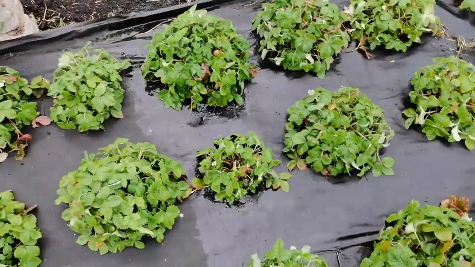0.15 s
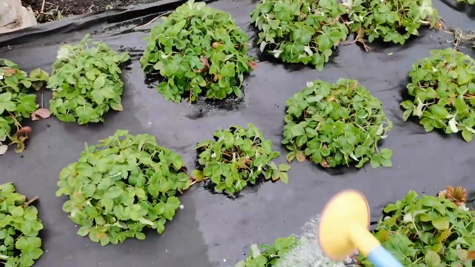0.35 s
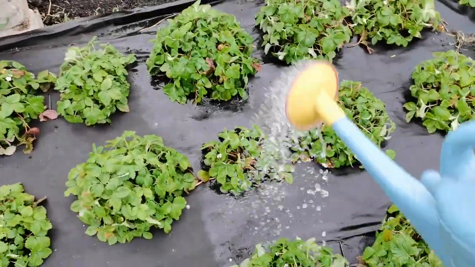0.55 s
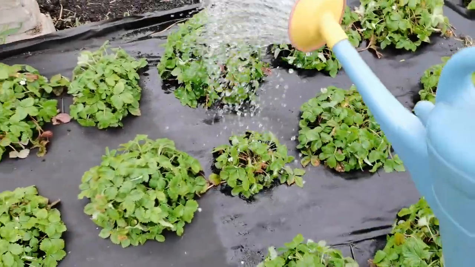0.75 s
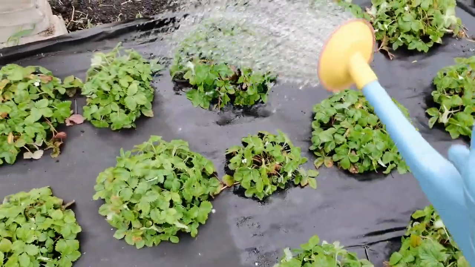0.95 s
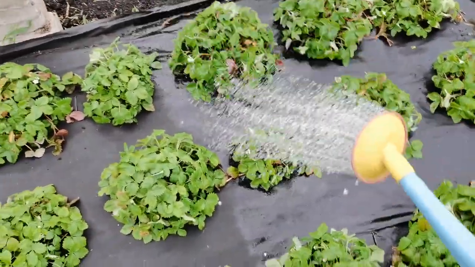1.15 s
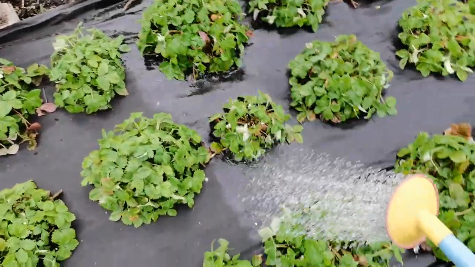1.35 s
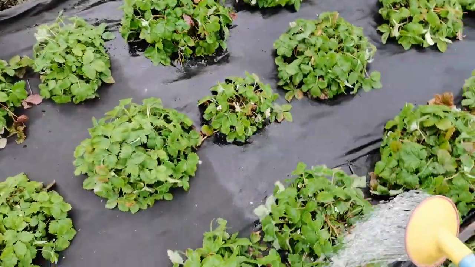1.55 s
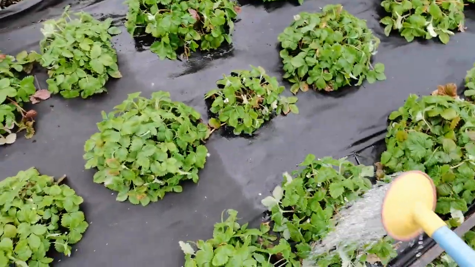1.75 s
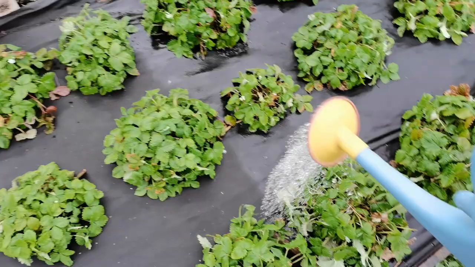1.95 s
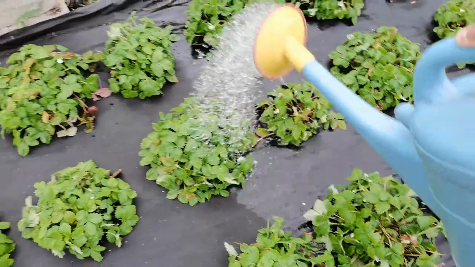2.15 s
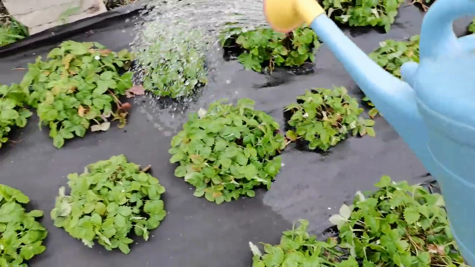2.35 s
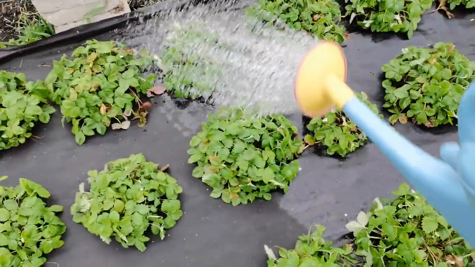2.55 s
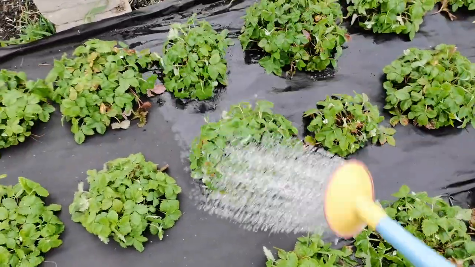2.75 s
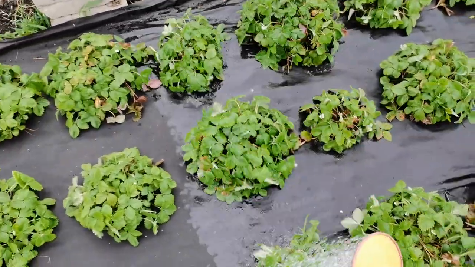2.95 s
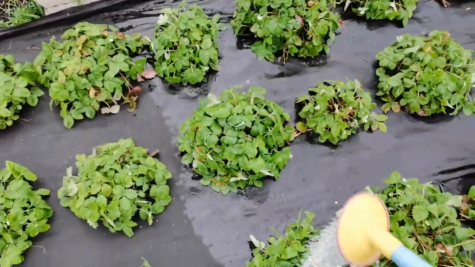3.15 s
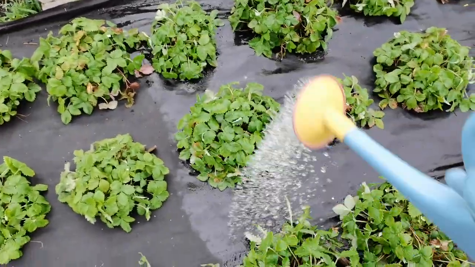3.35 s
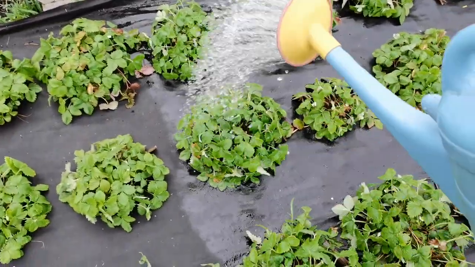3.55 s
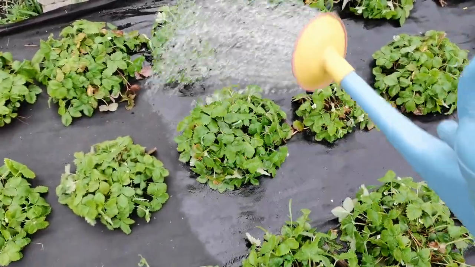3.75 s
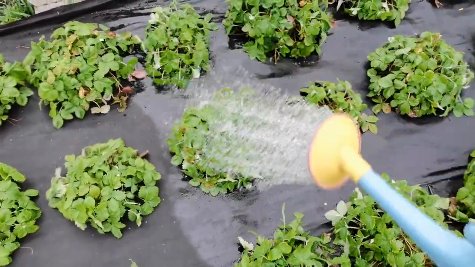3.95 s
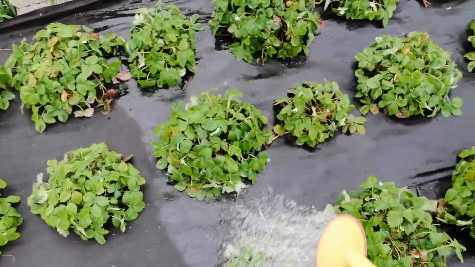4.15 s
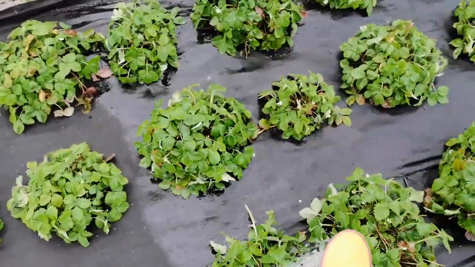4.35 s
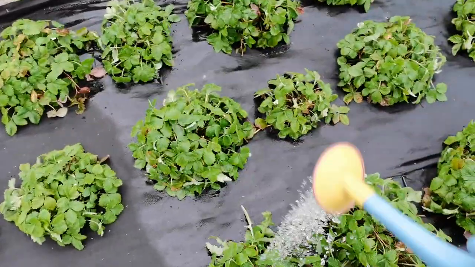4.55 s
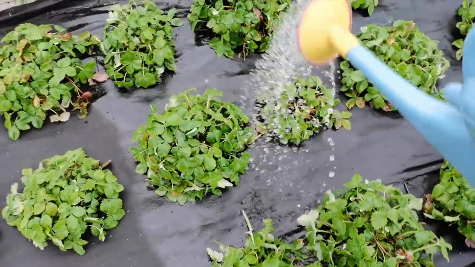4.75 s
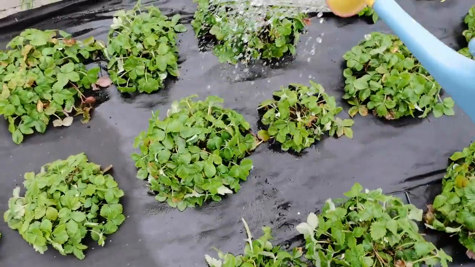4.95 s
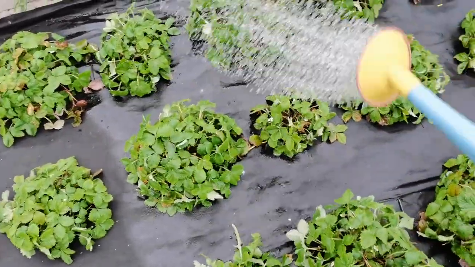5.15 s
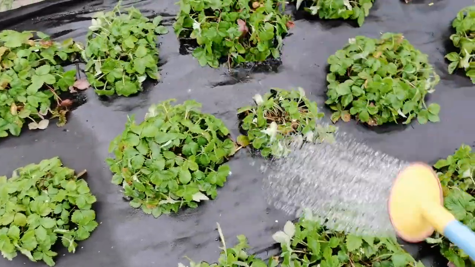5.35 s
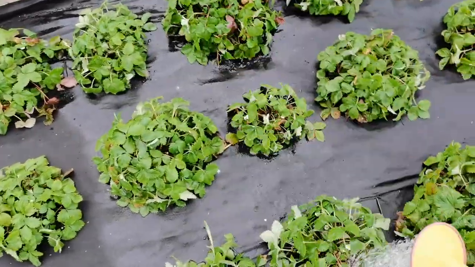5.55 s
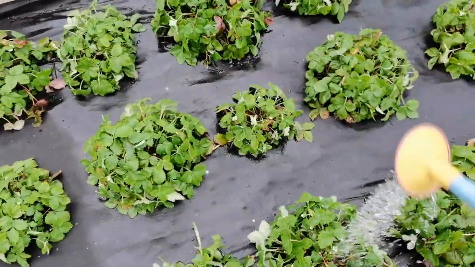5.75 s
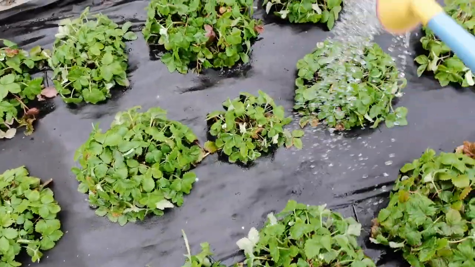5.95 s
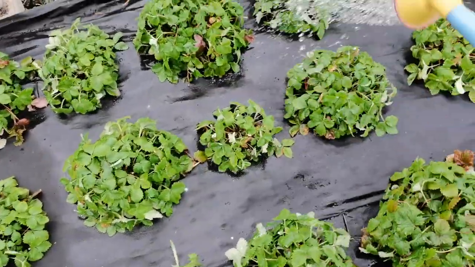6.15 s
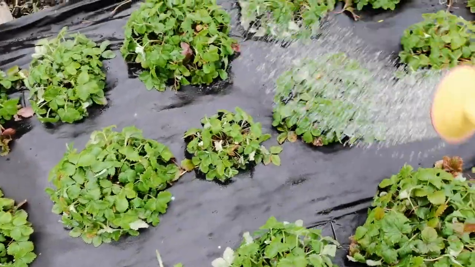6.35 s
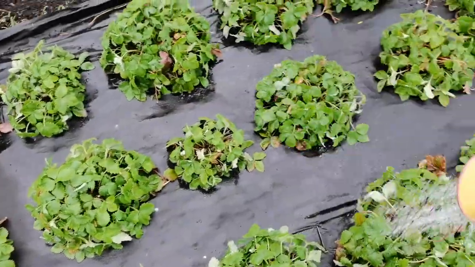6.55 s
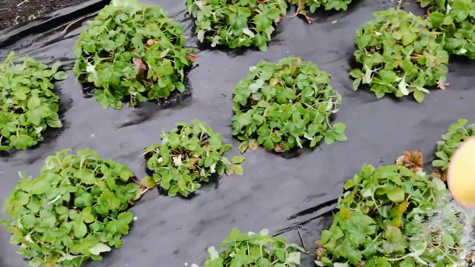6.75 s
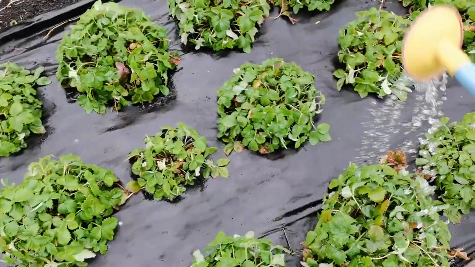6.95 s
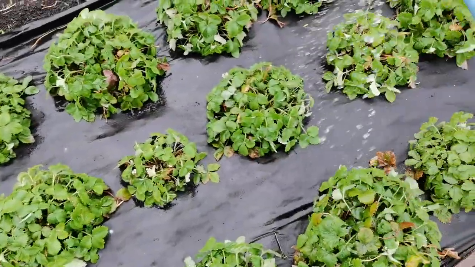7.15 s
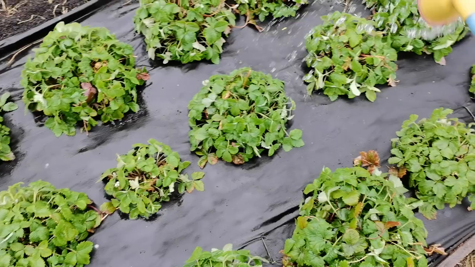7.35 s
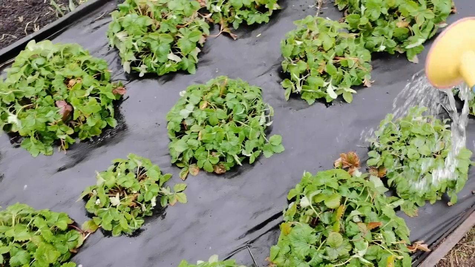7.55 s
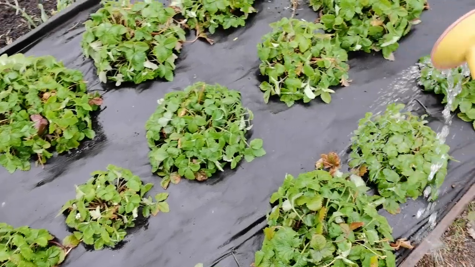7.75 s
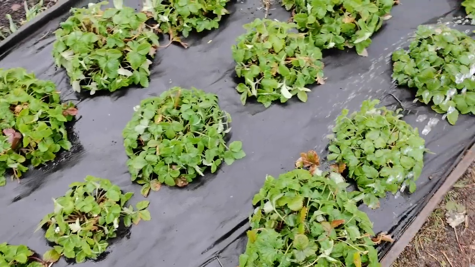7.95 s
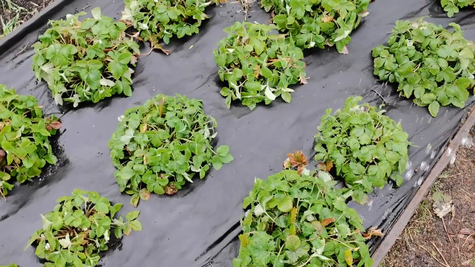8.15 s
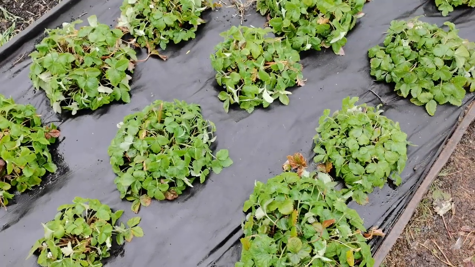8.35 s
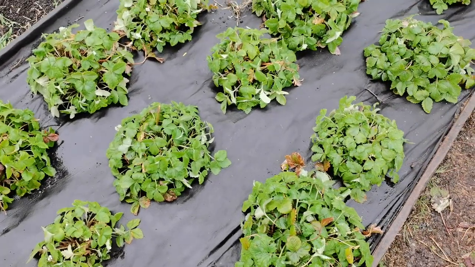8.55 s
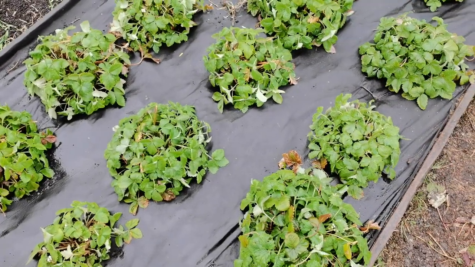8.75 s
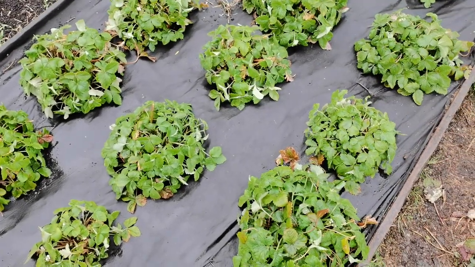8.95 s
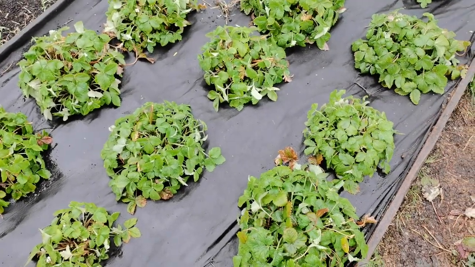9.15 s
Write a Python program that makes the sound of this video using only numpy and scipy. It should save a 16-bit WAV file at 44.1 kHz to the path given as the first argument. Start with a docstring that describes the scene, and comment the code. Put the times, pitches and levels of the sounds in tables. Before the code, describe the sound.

Close, dry stereo pickup outdoors, with very quiet air behind. A thin trickle opens, with small low gulps from a plastic watering can. At about 0.4 s a hollow knock booms, followed by rising bubbly gulps until 0.7 s. From 0.5 s, spray comes in uneven surges, a fraction of a second each: dull drumming on mulch fabric, slightly lower in pitch as the spray swings outward, with wet spatter, bright leaf hiss and sharp little snaps. Lulls fall near 1.6-1.9, 3, 4.3 and 5.6 s. A fainter knock and gulp come at 3 s, more gulps around 3.6 s. A stiff leaf rattles briefly at 6.1 s. Soft footfalls thump near 6.8 s, then a gritty scuff at 7.1 s. After 7.5 s the spray breaks into heavy, separate pats on fabric, thinning by 8.3 s. Soft muddy plops on soil cluster from 8.7 to 9.1 s, then near silence.

```python
"""Water sprays from a swung plastic watering can over leafy plants that grow through sheets of mulch fabric.
Random drops drum on the fabric through sliding resonances, spatter on its wet film and hiss on the leaves,
in surges over a thin trickle; the spray ends in scattered drips, the last ones on soil.
Gliding tones make air gulps in the can; decaying tones and noise make a hollow knock and a fainter one.
The gardener's feet are low thumps and gritty noise; soft shaped noise is the quiet air outdoors."""
import sys
import numpy as np
from scipy import signal
from scipy.fft import rfft, irfft, next_fast_len
from scipy.io import wavfile
from scipy.ndimage import map_coordinates

SR = 44100
rng = np.random.default_rng(int(sys.argv[2]) if len(sys.argv) > 2 else 0)


def store_wav(level_fs):
    """Save 16-bit WAV to argv[1]."""
    pcm = np.round(np.clip(np.atleast_2d(level_fs), -1, 1) * 32767)
    wavfile.write(sys.argv[1], SR, pcm.T.astype(np.int16))


N = 409688

# Water flow: t/s, flow/(drops per s)
WATER_FLOW = [(0, 920), (.7, 1570), (1.2, 2720), (6.5, 2270), (7.5, 800), (7.8, 216), (9.29, 145)]
# Swings of the can, out and back: start t/s, farthest t/s, end t/s
CAN_SWINGS = [(0.36, 0.937, 1.34), (1.872, 2.55, 2.77), (3.317, 3.687, 4.07), (4.615, 5.055, 5.45),
              (5.716, 6.257, 6.62), (6.62, 7.297, 8.24), (8.307, 8.9, 9.4)]
# Surges of spray across a plant and the fabric around it: t/s, length/s, thud level/dB, swell over length/dB,
# then levels over the thud: slap/dB, wet spatter/dB, leaf hiss/dB
SPRAY_SURGES = [(0, 0.068, -49, -19, -10.5, -14, -25), (0.483, 0.26, -41, -6, -4.5, -16.5, -19.5),
                (0.737, 0.14, -42, 2, -1.5, -11.5, -11.5), (0.92, 0.43, -41, 3, 1, -4, -3),
                (1.114, 0.04, -36, 3, 3, -12, -2.5), (1.212, 0.13, -35.5, 4, -3, -11.5, -4),
                (1.564, 0.14, -60, -0.5, -5, 8.5, 6), (1.975, 0.13, -36.5, -1.5, -2.5, -13, -19.5),
                (2.236, 0.1, -40, 6.5, 1, -7.5, -20.5), (2.406, 0.15, -41, 4, -3.5, -8.5, -11.5),
                (2.508, 0.19, -37.5, 4, 2.5, -7, -8), (2.71, 0.18, -37, 1.5, -4, -9, -14),
                (2.808, 0.1, -32.5, 2.5, -1.5, -9, -11.5), (3.333, 0.069, -37, 6, -5.5, -17, -17),
                (3.415, 0.067, -45.5, -1, -3, -16, -8), (3.581, 0.14, -39, 9, -3.5, -13, -14),
                (3.758, 0.25, -37.5, 0, -2, -6.5, -4.5), (4.061, 0.12, -34.5, 1.5, -5, -14.5, -3.5),
                (4.503, .08, -53, -3, -9, -25, -26), (4.643, 0.14, -36.5, -1, -7.5, -20.5, -23),
                (4.863, 0.15, -39, -6, -5.5, -13.5, -42), (5.084, 0.015, -40, 3.5, -6, -2, -2),
                (5.11, 0.21, -38, 2, -2.5, -6.5, -4.5), (5.24, 0.16, -35, 1.5, -1, -12.5, -3.5),
                (5.83, 0.147, -39, 4.5, -9.5, -22.5, -30), (5.984, 0.46, -41, 7, -4, -9, -16.5),
                (6.277, .055, -37, 2.5, -1, -7, -6), (6.329, 0.071, -34.5, -0.5, -2, -6.5, -4),
                (6.443, 0.074, -38.5, 0, -7.5, -5, -2.5), (7.174, 0.29, -49, 8, -3.5, -6.5, -17.5),
                (7.507, 0.16, -46, 0, -8, -6, -2), (7.676, 0.36, -49, 1.5, -7.5, -9.5, -16),
                (8.027, 0.25, -53, -6, -3, -13, -31), (8.525, 0.13, -57, 3.5, -23, -2.5, -7),
                (8.812, 0.18, -55, 1, -8, -17, -35), (8.873, 0.28, -62.5, -1, -5, -2, -26)]
# Thin trickle that goes on between surges: t/s, level/dB
TRICKLE_LEVEL = [(0, -58.5), (1.6, -59), (3.2, -60), (4.4, -58), (5.7, -60), (6.9, -64.5), (8.5, -69),
                 (9.29, -99)]
# Air gulps inside the can: t/s, peak level/dB, starting f/Hz, length/s, rise/octaves
AIR_GULPS = [(.0, -37, 124, 0.028, 0), (0.051, -38.5, 185, 0.028, 0.59), (.075, -48, 475, 0.038, 0.28),
             (0.453, -29, 181, 0.041, 0.65), (0.529, -26.5, 196, 0.02, 0.19), (.55, -23, 216, 0.033, 0.4),
             (.55, -36, 680, 0.031, 0.12), (0.554, -35.5, 930, 0.02, 0.49),
             (0.595, -47.5, 1740, .018, 0.32), (0.611, -24.5, 846, 0.015, 0.31),
             (0.618, -19.5, 207, 0.051, 0.24), (1.512, -41, 217, 0.038, 0.51),
             (1.679, -40.5, 166, 0.052, 0), (2.982, -27.5, 160, 0.042, 0.078),
             (3.551, -36.5, 705, 0.024, 0), (3.6, -26.5, 156.7, 0.072, 0.24), (3.78, -37, 167, 0.061, 0.23)]
# Knocks on the can: t/s, hollow boom level/dB, shell level/dB
CAN_KNOCKS = [(0.421, -5.5, -20.5), (2.961, -22, -45)]
# Tones of the water-filled body: f/Hz, level/dB, t60/s
BODY_MODES = [(76, -38.5, 1), (142.2, -15.5, 0.26), (208.4, -5.5, 0.16), (236.7, 7.5, 0.049),
              (287, -5.5, 0.045), (419, -15, 0.094)]
# Tones of the plastic shell: f/Hz, level/dB, t60/s
SHELL_MODES = [(700, -15, .2), (953, -5, 0.25), (1110, -14, .2), (1475, -10, 0.2), (1950, -12, .2),
               (2386, -5.5, 0.2), (2800, -3, .1), (2935, -1.5, 0.14), (3114, -1.5, 0.18), (3411, -2.5, .2),
               (3568, 3, 0.1), (3899, -10, .19), (8250, -2, .1), (11500, 4.5, .03)]
# Single snaps and ticks, loud and faint, most of them drops on leaves:
# t/s, level/dB, f/Hz, left minus right/dB, t60/s
SINGLE_SNAPS = [(.641, -45, 7040, -2, .012), (.659, -41.5, 7000, -2, .01), (.794, -34, 9570, -4.5, 0.0045),
                (.868, -32.5, 7970, 1, 0.009), (1.027, -31, 11400, 6, 0.0081),
                (1.0977, -29.5, 8480, 4, .01), (1.132, -32, 8700, 1, .006), (1.144, -26.5, 8110, 6, 0.0044),
                (1.314, -21, 6340, -5.5, 0.0075), (1.4217, -33.5, 8200, -9, 0.0069),
                (1.784, -39.5, 7960, -3, 0.0074), (2.126, -33.5, 4700, -5, 0.0065),
                (2.195, -39.5, 4400, -1, 0.072), (2.584, -33, 9070, -3, 0.0054),
                (2.863, -32, 8350, 0, .007), (2.9, -32.5, 6400, -3, .009), (2.961, -34, 9050, -5, 0.067),
                (3.093, -43, 8340, -3.5, .008), (3.112, -40, 8840, 4, 0.011), (3.129, -38, 8900, 0, 0.024),
                (3.3028, -40, 8500, -3, 0.0095), (3.331, -35.5, 8060, -1, 0.011),
                (3.3644, -37.5, 5900, -.5, .009), (3.393, -28, 9400, 1, 0.014),
                (3.45, -31.5, 8900, 3, 0.011), (3.4644, -39, 7040, 2, .01),
                (3.9183, -24.5, 7900, 8, 0.0059), (3.949, -23, 10700, 2, .006), (4.028, -32, 8700, 8, .005),
                (4.093, -26, 8100, 0, 0.0043), (4.122, -29.5, 6200, -2, .004),
                (4.668, -33, 9200, -5, 0.0091), (4.709, -39, 4600, -3, 0.011),
                (4.723, -35.5, 5000, -1, 0.013), (4.9415, -35.5, 9300, 1.5, 0.0086),
                (5.014, -40, 8900, 1, 0.0087), (5.074, -34, 9570, -2, 0.0067),
                (5.203, -33, 9300, -3, 0.0052), (5.2318, -22, 8900, -1, 0.0035),
                (5.3584, -35, 9060, -4, 0.0025), (5.3874, -35, 5230, -3.5, .006),
                (5.424, -28, 6300, -5, 0.0086), (5.9085, -46, 10000, -2, .006),
                (5.936, -46, 8240, -3, .006), (5.978, -41, 8040, -1, 0.025), (5.997, -42, 8250, -2, .006),
                (6.38, -27.5, 4200, -2, 0.0048), (6.497, -39, 9500, -1, 0.0078),
                (6.508, -21.5, 9700, -5, 0.0024), (6.53, -32, 8400, -8, 0.006),
                (6.8105, -37.5, 9100, -0.5, 0.0072), (6.838, -39.5, 9100, -1, 0.015),
                (6.8794, -40, 9600, 3, .008), (7.1733, -41.5, 8900, -1, 0.01),
                (7.406, -36.5, 6600, 0, 0.0086), (7.4368, -31.5, 5070, -4, 0.0062),
                (7.4665, -32.5, 4900, -3, 0.012), (7.522, -39, 9600, 6, 0.0092),
                (7.6073, -33.5, 4430, -0.5, 0.0088), (7.664, -42, 8500, 0, 0.0056),
                (7.717, -35, 7950, -7, 0.0088), (7.752, -39, 8800, -2, .012), (7.777, -44, 8500, -3, .012),
                (7.8311, -40, 8350, -2, .008), (7.885, -34, 6300, -6, 0.0058),
                (7.929, -39.5, 8500, -2, .008), (7.934, -35, 4400, 0, 0.0086),
                (8.018, -44.5, 6040, -7, .006), (8.094, -23.5, 8260, -1.5, 0.0049),
                (8.223, -38.5, 7600, -2, 0.0082), (8.3916, -43.5, 8600, -5, 0.01),
                (8.409, -45, 8590, -4, .005), (8.48, -47, 8200, -6, 0.0074), (8.7365, -51, 8300, -9, .005)]
# Heavy drops on the fabric: t/s, level/dB, bump f/Hz, slap level/dB, slap pitch ratio/1,
# splash level/dB, splash f/Hz
HEAVY_DRIPS = [(.725, -26.5, 180, 11.5, 1.1, -26, 1350), (1.05, -23.5, 345, 6, 1.1, -18, 1470),
               (2.297, -27, 333, 9, 0.98, -8, 1360), (3.752, -25, 690, 6, 1, -5, 1640),
               (3.778, -29.5, 325, -5, 1, 2, 1730), (4.879, -23.5, 675, -6, 0.81, -28, 1250),
               (5.082, -32.5, 330, -1, 1.6, 0, 1690), (5.975, -25, 220, 8.5, 1, -16, 1290),
               (6.267, -26, 580, -9, 0.77, -28, 1360), (7.537, -32.5, 199, 7, 0.97, -16, 1500),
               (7.553, -34, 302, 8, 1, -16, 1500), (7.619, -27, 186, 2, 1.2, -12, 1500),
               (7.632, -20.5, 206, 0, 1.24, -23, 1500), (7.664, -34, 258, 16.5, 1.1, -15, 1400),
               (7.691, -25.5, 327, -4, 1.3, -27, 1370), (7.73, -46, 252, 12, 1.3, -18, 1500),
               (7.804, -31, 328, -2, 1.21, -32, 1500), (7.831, -30, 223, 4, 1.2, -21, 1600),
               (7.859, -37, 260, 5, 1.6, -11, 1600), (7.871, -30, 215, -8, 1, -16, 1600),
               (7.887, -31, 260, -9, 0.92, -20, 1500), (7.911, -26.5, 198, 6.5, 1.24, -13, 1630),
               (7.932, -29, 259, -14, 1, -18, 1620), (7.968, -30, 243, -10, 1.15, -17, 1501),
               (7.979, -27.5, 228, -1, 1.1, -9, 1740), (8.009, -28, 218, -9, 1.1, -17, 1700),
               (8.018, -29, 274, 5, 1.16, -8, 1710), (8.056, -32.5, 331, -1, 1.15, -28, 1500),
               (8.093, -30, 180, 3, 1.06, -19, 1500), (8.13, -29, 192, -7, 1.1, -21, 1510),
               (8.164, -35, 250, 5, 1.03, -9, 1500), (8.184, -27, 202, -7, 1.2, -17, 1600),
               (8.198, -26.5, 229, -7, 0.99, -32, 1500), (8.222, -38, 258, -2, 1, -11, 1510),
               (8.239, -36, 247, -8, 1, -28, 1500), (8.254, -33.5, 267, 2, 1.04, -27, 1510),
               (8.525, -26, 310, -8, 0.79, -17, 1090), (8.547, -36, 343, -7, .75, -26, 1100),
               (8.569, -27.5, 320, 6, 0.72, -11, 1080), (8.583, -28.5, 343, -6, 1.05, -32, 1100),
               (8.593, -29.5, 327, 0, 1.3, -15, 1350)]
# Soft footfalls: t/s, level/dB
FOOTFALLS = [(1.791, -42), (5.642, -34.5), (6.621, -46), (6.819, -30.5), (6.901, -36.5), (8.645, -39.5)]
# A shoe scuffs gritty soil: t/s, length/s, level/dB, pitch ratio/1
SHOE_SCUFFS = [(7.04, 0.023, -51.5, 1.2), (7.071, 0.18, -48, 0.98), (7.265, 0.044, -45.5, 1.37)]
# Larger grains crack under a shoe: t/s, level/dB, pitch ratio/1
GRAIN_CRACKS = [(1.861, -39, 0.85), (7.061, -42, 1.25), (7.129, -44, 0.94), (7.146, -40, 0.9),
                (7.201, -41, 0.85), (7.245, -37, 1.14), (7.26, -39, 1.3), (7.278, -39, 1.06)]
# The hard jet briefly rattles a stiff leaf: t/s of the snap, level/dB, t60/s
LEAF_RATTLES = [(6.103, -25.5, 0.12)]
# Last drips on the soil beside the bed: t/s, level/dB, plop f/Hz, smack level/dB, smack f/Hz
SOIL_PLOPS = [(8.737, -48, 404, -1, 3430), (8.774, -40, 513, -22, 2400), (8.803, -39, 420, -24, 2400),
              (8.813, -43, 440, -18, 2400), (8.828, -35, 500, -15.5, 2770), (8.836, -39, 450, -21, 2600),
              (8.867, -41, 380, -4.5, 2360), (8.881, -39, 424, -11, 2500), (8.889, -36, 382, -9, 2410),
              (8.899, -37, 450, -8, 2380), (8.905, -36, 432, -12, 2320), (8.9334, -30.5, 405, -7, 2000),
              (8.943, -43, 420, -3, 2500), (8.9752, -34.5, 401, -13.5, 2700),
              (8.9912, -31.5, 456, -4.5, 2500), (9.0175, -33, 455, -20, 1820),
              (9.0347, -40.5, 380, -6, 2300), (9.087, -48, 450, -6, 3070), (9.124, -45.5, 447, -2, 3000)]

# Spectrum shapes; only the balance between frequencies counts.
# Lower resonance of the fabric: f/Hz, level/dB
THUD_SPECTRUM = [(40, -44), (85, -18.5), (125, -11), (175, -1.5), (300, 1.5), (400, -1), (470, -16),
                 (530, -14), (700, -55.5)]
# Upper resonance of the fabric: f/Hz, level/dB
SLAP_SPECTRUM = [(400, -36.5), (520, -23.5), (600, 2.5), (720, 4), (860, 2), (1000, -6), (1200, -14.5),
                 (1700, -12.5), (3000, -58.5)]
# Drops shattering on the water film: f/Hz, level/dB
SPATTER_SPECTRUM = [(700, -37), (1130, -1), (1290, -9.5), (1560, -1.5), (1900, -5.5), (2270, -1.5),
                    (2390, -5), (2520, 0.5), (3000, -4), (3600, -4.5), (4300, -5.5), (5200, -25),
                    (6500, -13), (10000, -51)]
# Mist on the leaves: f/Hz, level/dB
HISS_SPECTRUM = [(2500, -9.5), (4500, -6), (6000, -6), (7300, -11.5), (8400, 1.5), (9600, -0.5),
                 (11000, -2.5), (13000, -4.5), (15500, -14.5)]
# Crack of the can's shell: f/Hz, level/dB
CRACK_SPECTRUM = [(400, 4.5), (1400, 2.5), (2000, -4), (3200, 1.5), (4500, 1), (6000, 4), (8300, 5),
                  (12000, 4.5), (16000, -12)]
# Rattle of the stiff leaf: f/Hz, level/dB
STIFF_LEAF_SPECTRUM = [(290, -28), (500, -20), (749, 5), (972, -21), (1100, -13), (1440, -11), (1670, -7),
                       (1900, -19), (2360, 0.5), (2570, -22), (2830, -12), (3270, -30), (5000, -38),
                       (6500, -61), (11000, -120)]
# Gritty soil: f/Hz, level/dB
GRIT_SPECTRUM = [(700, -44), (1200, -15), (1580, 13), (1950, 6.5), (2600, -5.5), (3300, -13), (5000, -25.5)]
# Still outdoor air: f/Hz, level/dB
AIR_SPECTRUM = [(20, -10), (55, -7), (100, -0.5), (300, -10), (900, -15.5), (3000, -29.5), (8000, -33.5),
                (11000, -36.5), (16000, -38)]
# Snap of a drop on a leaf: multiple of its own pitch/1, level/dB
SNAP_SPECTRUM = [(.15, -49), (.45, -11), (.75, -6), (1, 6), (1.3, -3.5), (1.8, -9), (3, -27)]
# Splash on the fabric: multiple of its own pitch/1, level/dB
SPLASH_SPECTRUM = [(.3, -37), (.6, -0.5), (.8, -10), (1, 3.5), (1.201, -12), (1.5, -8), (2.2, -16),
                   (3.2, -17), (6, -50)]
# Smack on wet soil: multiple of its own pitch/1, level/dB
SMACK_SPECTRUM = [(.25, -26), (.6, 2), (1, 3), (1.25, -1), (1.45, -20), (1.8, -20), (3, -33)]
# Treble balance of the two microphone ports: f/Hz, left minus right/dB
MICROPHONE_PORTS = [(500, 1), (1200, -0.5), (4500, -1), (6500, 2.5), (8300, -9), (10000, -5.5), (12000, 3),
                    (16000, 0)]

TOP_HZ = 16100  # upper limit of the band that is kept
# pitch ratio of the drumming when the spray lands near and when it is thrown far
NEAR_PITCH, FAR_PITCH = 1.18, 0.93
ATTACK_DB_PER_S, RELEASE_DB_PER_S = 289, 255
# the fringe of the spray reaches the leaves early and lingers
LEAF_ATTACK_DB_PER_S, LEAF_RELEASE_DB_PER_S = 190, 166
ARCH_DB = 1.5  # the middle of a surge stands this much over its ends
HISS_SWELL = 2.46  # the leaves swell this many times as much, in dB, as the fabric
# water runs off the leaves after each surge: level against its hiss, and how fast it dies
RUNOFF_DB, RUNOFF_DB_PER_S = -8, 54.5
# level of each layer against the trickle
TRICKLE_THUD_DB, TRICKLE_SLAP_DB, TRICKLE_SPATTER_DB, TRICKLE_HISS_DB = 0.5, -7, 0.5, -0.5
# fragments that even a thin flow throws onto the film and the leaves
SHATTER_PER_S, MIST_PER_S = 600, 2500
DROPLET_SHARE_PER_LEAF = 0.012  # share of the drops that tick crisply on one leaf
SHELL_BLUR_HZ = 30  # water moving against the shell blurs its tones
# stray leaf snaps: rate, level at the loudest hiss (as in SINGLE_SNAPS), share of the hiss's fall in dB followed
SNAPS_PER_S, SNAP_DB, SNAP_FOLLOWS = 9.7, -31, 0.63
SNAP_SCATTER_DB, SNAP_HZ, SNAP_SPREAD_OCTAVES, SNAP_T60_S = 3, 8200, 0.34, 0.012
# stray pats on the fabric: rate, drip level over the thud, scatter, pitch and its spread
PATS_PER_S, PAT_OVER_THUD_DB, PAT_SCATTER_DB, PAT_HZ, PAT_SPREAD_OCTAVES = 4, 3, 1, 264, 0.64
PAT_SPLASH_DB, PAT_SPLASH_HZ = -6, 1850


def amp(db):
    """Turn decibels into gain."""
    return 10 ** (np.asarray(db) / 20)


def unit(x):
    """Scale to rms 1."""
    return x / np.sqrt(np.mean(x ** 2) + 1e-20)


def unit_energy(x):
    """Scale each ear to energy 1."""
    return x / np.linalg.norm(x, axis=1, keepdims=True)


def curve(rows):
    """Draw straight lines between (time, value) points, one value per sample."""
    times, values = np.transpose(rows)
    return np.interp(np.arange(N) / SR, times, values)


def add(out, s, sound):
    """Mix a sound in at a time in seconds."""
    start = max(round(s * SR), 0)
    part = out[..., start:start + sound.shape[-1]]
    part += sound[..., :part.shape[-1]]


def response(points, ratio=1, size=4096):
    """Make a filter of energy 1 that acts without delay, with a given spectrum shifted by a pitch ratio."""
    hz, db = np.transpose(points)
    bins = np.fft.rfftfreq(size, 1 / SR) + 1
    log_gain = np.log(amp(np.interp(np.log(bins), np.log(hz * ratio), db)))
    # folding the cepstrum puts the energy as early as possible
    cepstrum = irfft(log_gain)
    cepstrum[1:size // 2] *= 2
    cepstrum[size // 2 + 1:] = 0
    h = irfft(np.exp(rfft(cepstrum)))
    return h / np.linalg.norm(h)


def colour(x, points, ratio=1):
    """Filter a stereo signal through a spectrum."""
    return signal.fftconvolve(x, response(points, ratio)[None], axes=1)[:, :x.shape[1]]


def fade(t, t60):
    """Let a sound die freely, by 60 dB in t60 seconds."""
    return np.exp(-np.log(1000) * t / max(t60, 1e-4))


def spread(mid, side, side_db):
    """Make left and right from a shared part and an opposed part."""
    opposed = amp(side_db) * side
    return np.array([mid + opposed, mid - opposed]) / np.sqrt(1 + amp(2 * side_db))


def impacts(rate, scatter_db):
    """Make two unrelated trains of random drop impacts of uneven size, with rms 1 overall."""
    hits = rng.random((2, N)) < rate / SR
    size = amp(scatter_db * np.minimum(rng.standard_normal((2, N)), 2.3))
    sign = rng.choice([-1, 1], (2, N))
    return unit(hits * size * sign / np.sqrt(rate))


def flutter(rate, depth_db):
    """Make a randomly wavering gain of rms 1, with rate new values a second."""
    knots = rng.standard_normal(int(N * rate / SR) + 4)
    return unit(amp(depth_db * map_coordinates(knots, [np.arange(N) * rate / SR], order=1)))


def burst(t, t60):
    """Make a dying puff of noise, different at each ear."""
    return unit_energy(rng.standard_normal((2, len(t))) * fade(t, t60))


def soft_puff(t, t60, rise=0.0035):
    """Make a puff of noise with a soft onset that then dies."""
    return unit_energy(burst(t, t60) * (1 - fade(t, rise)) ** 2)


def sliding(x, points, ratio, count=6):
    """Slide a spectrum in pitch by cross-fading between fixed tunings."""
    tunings, step = np.linspace(ratio.min(), ratio.max(), count, retstep=True)
    return sum(colour(x * np.maximum(1 - abs(ratio - k) / step, 0), points, k) for k in tunings)


def pings(rate, centre_hz, octaves, cycles, scatter_db, size=500):
    """Ring tiny bubbles, each dying over a set number of cycles at its own rising pitch; rms 1 together."""
    count = int(np.clip(rate * N / SR, 1, 9000))
    when, pitch, strength, place = rng.random((count, 4)).T[..., None]
    turns = centre_hz * 2 ** (octaves * (2 * pitch - 1)) * np.arange(size) / SR
    life = turns / cycles
    ring = np.exp(2j * np.pi * turns * (1 + 0.13 * np.minimum(life, 2)))
    ring *= fade(life, 1) * (1 - np.exp(-turns))
    ring *= amp(scatter_db * np.minimum(-np.log(strength), 3.5))
    index = ((when * N).astype(int) + np.arange(size)).ravel()
    # the bearing of each bubble shifts its phase between the ears
    shift = (place - .5) * centre_hz / 1500
    ears = [(ring * np.exp(1j * sign * shift)).imag for sign in (1, -1)]
    return unit(np.array([np.bincount(index, ear.ravel(), N)[:N] for ear in ears]))


def strays(rate, flow, level_db, scatter_db, hz, octaves, size=300):
    """Draw random big drops (t/s, level/dB, f/Hz); jets break into them more often when the flow is thin."""
    when, strength, pitch = rng.random((size, 3))[:int(rate * N / SR)].T
    chance = np.cumsum(1 / flow)
    at = np.searchsorted(chance, when * chance[-1])
    drop_db = level_db[at] + scatter_db * (2 * strength - 1)
    return zip(at / SR, drop_db, hz * 2 ** (octaves * (2 * pitch - 1)))


def envelope(s, length, swell_db=0, attack_db_per_s=ATTACK_DB_PER_S, release_db_per_s=RELEASE_DB_PER_S):
    """Shape a gain that rises, arches while its level slopes by swell_db, and is released."""
    t = np.arange(N) / SR - s
    u = np.clip(t / length, 0, 1)
    held_db = swell_db * (u - .5) + ARCH_DB * (np.sin(np.pi * u) - 2 / np.pi)
    rise_db = attack_db_per_s * np.maximum(-t, 0)
    fall_db = release_db_per_s * np.maximum(t - length, 0)
    return amp(held_db - rise_db - fall_db)


def pour():
    """Set thud, slap, spatter and hiss levels in dB: the strongest surge of the moment plus the trickle."""
    thud, slap, wet, hiss = np.zeros((4, N))
    for s, length, db, swell_db, slap_db, wet_db, leaf_db in SPRAY_SURGES:
        surge = amp(db) * envelope(s, length, swell_db)
        on_leaves = envelope(s, length, HISS_SWELL * swell_db, LEAF_ATTACK_DB_PER_S, LEAF_RELEASE_DB_PER_S)
        runoff = amp(RUNOFF_DB) * envelope(s, length, swell_db, release_db_per_s=RUNOFF_DB_PER_S)
        thud = np.maximum(thud, surge)
        slap = np.maximum(slap, amp(slap_db) * surge)
        wet = np.maximum(wet, amp(wet_db) * surge)
        hiss = np.maximum(hiss, amp(db + leaf_db) * np.maximum(on_leaves, runoff))
    hiss = hiss * flutter(rate=22, depth_db=2.0)
    trickle_db = curve(TRICKLE_LEVEL)
    layers = [(thud, TRICKLE_THUD_DB), (slap, TRICKLE_SLAP_DB),
              (wet, TRICKLE_SPATTER_DB), (hiss, TRICKLE_HISS_DB)]
    return [20 * np.log10(np.hypot(gain, amp(trickle_db + db))) for gain, db in layers]


def swing_pitch():
    """Lower the drumming as the spray is thrown out and raise it as the spray comes back."""
    t = np.arange(N) / SR
    reach = sum(np.sin(np.pi / 2 * np.interp(t, times, [0, 1, 0])) for times in CAN_SWINGS)
    return NEAR_PITCH + (FAR_PITCH - NEAR_PITCH) * reach


def fabric(thud_db, slap_db, flow):
    """Drum each drop on two broad resonances of the sheet, which slide in pitch with the swing."""
    ratio = swing_pitch()
    # the jets bunch and part
    drops = impacts(flow, scatter_db=3.5) * flutter(rate=45, depth_db=0.9)
    thud = spread(*drops, side_db=-14.5) * amp(thud_db)
    slap = spread(*drops, side_db=-15.0) * amp(slap_db)
    return sliding(thud, THUD_SPECTRUM, ratio) - sliding(slap, SLAP_SPECTRUM, ratio)


def spatter(level_db, flow):
    """Shatter drops on the sheet's water film; bigger ones patter at their own pitch, some trap a bubble."""
    hits = spread(*impacts(flow * .4 + SHATTER_PER_S, scatter_db=1.0), side_db=-4.0)
    drops = colour(hits, SPATTER_SPECTRUM)
    patter = pings(rate=260, centre_hz=2270, octaves=0.89, cycles=12.3, scatter_db=3.5, size=400)
    bubbles = pings(rate=120, centre_hz=2101, octaves=0.716, cycles=55, scatter_db=3.5, size=900)
    mix = amp(-7.0) * drops + amp(-11.0) * patter + amp(-11.5) * bubbles
    return mix * amp(level_db) * flutter(rate=70, depth_db=1.5)


def droplets(flow, centre_hz, octaves, count=7):
    """Tick separate crisp drops on several leaves, each leaf at its own pitch; rms 1 together."""
    out, t = np.zeros((2, N)), np.arange(SR // 50) / SR
    for hz in centre_hz * 2 ** (octaves * np.linspace(-1, 1, count)):
        hits = impacts(flow * DROPLET_SHARE_PER_LEAF, scatter_db=2.5)[0]
        tick = colour(soft_puff(t, t60=0.0075), SNAP_SPECTRUM, hz)
        out += signal.oaconvolve(hits[None], tick, axes=1)[:, :N]
    return unit(out)


def leaves(level_db, flow):
    """Hiss as a fine mist of drops, with sparser crisp drops and a fizz of pings among them."""
    hits = impacts(flow * 4.5 + MIST_PER_S, scatter_db=6.0) * flutter(rate=130, depth_db=1.5)
    mist = colour(hits, HISS_SPECTRUM)
    crisp = droplets(flow, centre_hz=9000, octaves=0.5)
    fizz = pings(rate=500, centre_hz=9720, octaves=0.564, cycles=57, scatter_db=5.0)
    return (amp(-3.5) * mist + amp(-8.0) * crisp + amp(-8.0) * fizz) * amp(level_db)


def still_air():
    """Make the quiet outdoor air from steady shaped noise."""
    return amp(-58.5) * colour(spread(*rng.standard_normal((2, N)), side_db=0.0), AIR_SPECTRUM)


def gulps():
    """Ring air bubbles in the can, most of them rising in pitch as they near the surface."""
    out = np.zeros((2, N))
    for s, db, hz, length, rise in AIR_GULPS:
        u = np.linspace(0, 1, max(int(length * SR), 10))
        phase = 2 * np.pi * np.cumsum(hz * 2 ** (rise * u)) / SR
        swell = abs(np.sin(np.pi * u ** 0.57)) ** 0.98
        add(out, s, amp(db) * np.sin(phase) * swell)
    return out


def wander(t, width_hz):
    """Make a drifting phase for each ear, which blurs a tone to the given width."""
    drift = np.cumsum(rng.standard_normal((2, len(t))), axis=1)
    return drift * np.sqrt(2 * np.pi * width_hz / SR) + 2 * np.pi * rng.random((2, 1))


def knocks():
    """Strike the can: its body booms, its shell cracks and rings briefly."""
    out, t = np.zeros((2, N)), np.arange(SR // 3) / SR
    ear_phase = np.array([[.3], [-.3]])
    swell = 1 - np.exp(-(t / 0.0064) ** 2)
    for s, boom_db, shell_db in CAN_KNOCKS:
        boom = sum(amp(db) * np.sin(2 * np.pi * hz * t + ear_phase) * fade(t, t60)
                   for hz, db, t60 in BODY_MODES)
        ring = sum(amp(db) * np.sin(2 * np.pi * hz * t + wander(t, SHELL_BLUR_HZ)) * fade(t, t60)
                   for hz, db, t60 in SHELL_MODES)
        crack = colour(amp(21) * soft_puff(t, t60=0.045) + amp(16) * burst(t, t60=0.17), CRACK_SPECTRUM)
        add(out, s, amp(boom_db + 4.0) * boom * swell + amp(shell_db) * (amp(-8.5) * ring + crack))
    return out


def ticks(hiss_db, flow):
    """Make single snaps and ticks, most of them drops on leaves, each at its own pitch with a short spray."""
    out, t = np.zeros((2, N)), np.arange(SR // 16) / SR
    snap_db = SNAP_DB + SNAP_FOLLOWS * (hiss_db - hiss_db.max())
    small = strays(SNAPS_PER_S, flow, snap_db, SNAP_SCATTER_DB, SNAP_HZ, SNAP_SPREAD_OCTAVES)
    stray_snaps = [(*drop, rng.normal(-2.5, 2.4), SNAP_T60_S) for drop in small]
    for s, db, hz, pan_db, t60 in list(SINGLE_SNAPS) + stray_snaps:
        snap = colour(soft_puff(t, t60) + amp(-10.5) * soft_puff(t, t60=0.046), SNAP_SPECTRUM, hz)
        add(out, s, snap * amp(db + 16.0) * amp([[pan_db / 2], [-pan_db / 2]]))
    return out


def drips(thud_db, flow):
    """Drop single heavy drips: a damped bump of the sheet, its slap, and a crisp splash with a bubble."""
    out, t = np.zeros((2, N)), np.arange(SR // 16) / SR
    small = strays(PATS_PER_S, flow, thud_db + PAT_OVER_THUD_DB, PAT_SCATTER_DB, PAT_HZ, PAT_SPREAD_OCTAVES)
    pats = [(*drop, 0, rng.uniform(0.99, 1.05), PAT_SPLASH_DB, PAT_SPLASH_HZ) for drop in small]
    for s, db, hz, slap_db, slap_ratio, splash_db, splash_hz in list(HEAVY_DRIPS) + pats:
        bump = np.cos(2 * np.pi * hz * t) * fade(t, t60=0.025) * (1 - fade(t, t60=0.011)) ** 2
        slap = response(SLAP_SPECTRUM, slap_ratio)[:len(t)]
        puff = amp(-3.0) * burst(t, t60=0.0042) + amp(-2.0) * burst(t, t60=0.037)
        splash = colour(puff, SPLASH_SPECTRUM, splash_hz)
        bubble_hz = splash_hz * rng.uniform(0.702, 1.5)
        bubble = np.sin(2 * np.pi * bubble_hz * t * (1 + t / 0.076))  # rises in pitch
        bubble *= fade(t, t60=0.015) * (1 - fade(t, t60=0.0089))
        wet = amp(14.5) * splash + amp(1.5) * bubble
        add(out, s, amp(db) * (amp(4.0) * bump + amp(slap_db + 1.0) * slap + amp(splash_db) * wet))
    return out


def feet():
    """Thump dull footfalls, and scuff a shoe on grit with larger grains cracking under it."""
    out, t = np.zeros((2, N)), np.arange(SR // 3) / SR
    for s, db in FOOTFALLS:
        push = sum(np.sin(2 * np.pi * hz * rng.uniform(0.867, 1.213) * t) for hz in (41, 56, 80)) / 2
        shape = fade(t, t60=0.32) * (1 - fade(t, t60=0.067))
        add(out, s, amp(db) * push * shape * amp([[2], [-5]]))  # stronger on the left
    for s, db, ratio in GRAIN_CRACKS:
        add(out, s, amp(db + 17) * colour(burst(t, t60=0.0099), GRIT_SPECTRUM, ratio))
    grains = spread(*impacts(600, scatter_db=3.5), side_db=-2.5)
    for s, length, db, ratio in SHOE_SCUFFS:
        out += colour(grains * amp(db) * envelope(s, length), GRIT_SPECTRUM, ratio)
    return out


def rattle():
    """Rattle a stiff leaf under the jet: papery noise builds at a lower pitch, snaps and dies away."""
    out, t = np.zeros((2, N)), np.arange(SR // 3) / SR
    lead = .06  # seconds of build-up before the snap
    for s, db, t60 in LEAF_RATTLES:
        noise = spread(*rng.standard_normal((2, len(t))), side_db=-1.5)
        shake = amp(db) * noise * flutter(rate=253, depth_db=3.0)[:len(t)]
        before = amp(-15.0) * (t < lead) * fade(abs(t - lead), t60=0.31)
        after = (t >= lead) * fade(abs(t - lead), t60)
        build = colour(shake * before, STIFF_LEAF_SPECTRUM, ratio=0.685)
        snap = colour(shake * after, STIFF_LEAF_SPECTRUM)
        add(out, s - lead, build + snap)
    return out


def plops():
    """Land the last drips on soft wet soil: a dead, hollow plop under a brief resonant smack."""
    out, t = np.zeros((2, N)), np.arange(SR // 16) / SR
    ear_phase = np.array([[.4], [-.4]])
    for s, db, hz, smack_db, smack_hz in SOIL_PLOPS:
        bump = -np.cos(2 * np.pi * hz * t) * fade(t, t60=0.012) * (1 - fade(t, t60=0.0078)) ** 2
        crater = np.sin(2 * np.pi * smack_hz * t + ear_phase)
        crater *= fade(t, t60=0.007) * (1 - fade(t, t60=0.0024))
        spray = colour(burst(t, t60=.005) + amp(-7.0) * burst(t, t60=.05), SMACK_SPECTRUM, smack_hz)
        smack = amp(3.5) * crater + amp(13.0) * spray
        add(out, s, amp(db) * (amp(10.0) * bump + amp(smack_db) * smack))
    return out


def nearby(x, echo_db, count=9):
    """Add weak early echoes off can, gardener and ground; such small faces return only the treble."""
    echoes = np.zeros((2, N))
    for ear in range(2):
        for delay in rng.uniform(.001, .012, count):
            add(echoes[ear], delay, x[ear] * rng.choice([-1, 1]) / np.sqrt(count))
    treble = signal.butter(2, 900, "high", fs=SR, output="sos")
    return x + amp(echo_db) * signal.sosfilt(treble, echoes)


def scene():
    """Mix spray, can and gardener in still open air."""
    thud_db, slap_db, spatter_db, hiss_db = pour()
    flow = np.maximum(curve(WATER_FLOW), 20)
    spray = fabric(thud_db, slap_db, flow) + spatter(spatter_db, flow) + leaves(hiss_db, flow)
    can = gulps() + knocks()
    drops = ticks(hiss_db, flow) + drips(thud_db, flow) + plops()
    return nearby(spray + can + drops + rattle(), echo_db=-8.0) + feet() + still_air()


def record(dry):
    """Colour left and right differently, as two microphone ports do, and cut all above the band limit."""
    size = next_fast_len(N + SR // 2)
    hz = np.fft.rfftfreq(size, 1 / SR)
    tilt_db = np.interp(hz, *np.transpose(MICROPHONE_PORTS))
    gain = amp([tilt_db / 2, -tilt_db / 2]) * (hz < TOP_HZ)
    return irfft(rfft(dry, size) * gain, size)[:, :N]


dry = scene()
out = record(dry)
store_wav(out)
```